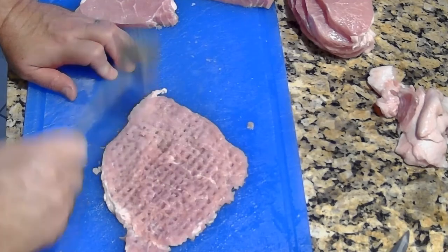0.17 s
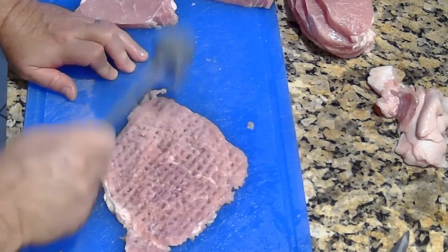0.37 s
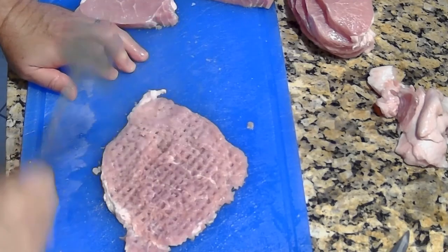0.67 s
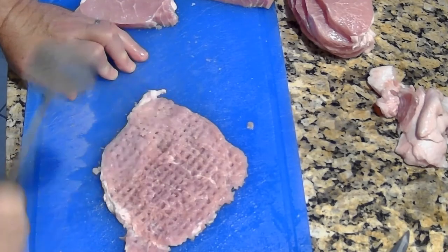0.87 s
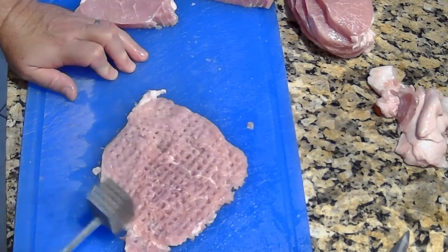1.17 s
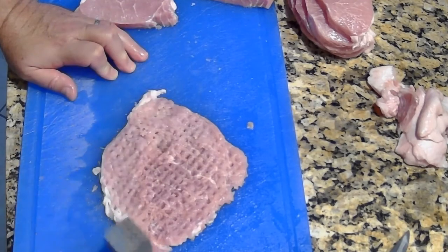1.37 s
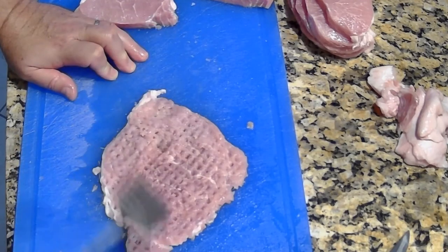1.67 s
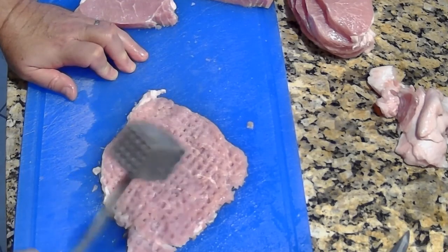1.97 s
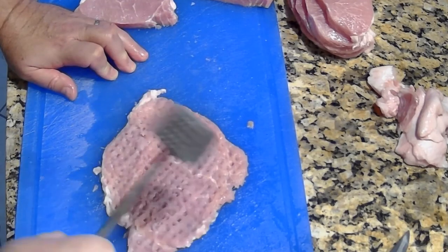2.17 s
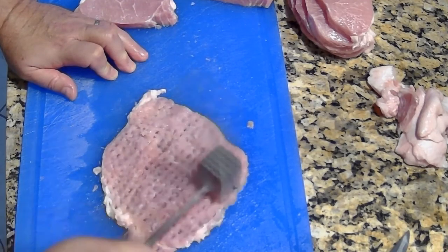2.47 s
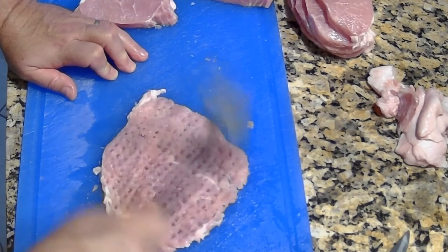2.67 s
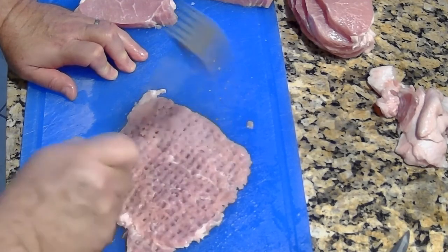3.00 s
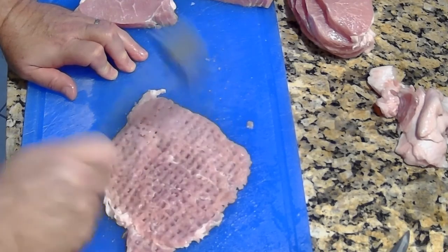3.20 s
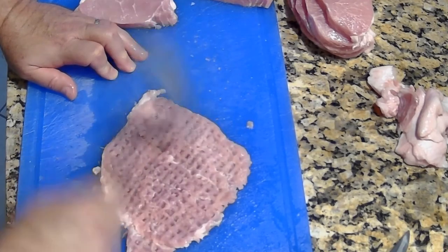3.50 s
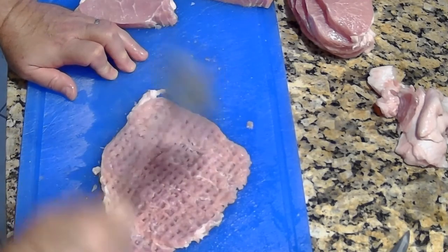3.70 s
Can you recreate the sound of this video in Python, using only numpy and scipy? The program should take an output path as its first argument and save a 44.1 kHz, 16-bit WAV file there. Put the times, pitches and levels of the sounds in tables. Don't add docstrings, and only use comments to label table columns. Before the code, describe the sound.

A meat mallet rapidly pounds raw pork on a plastic board, wet slaps with hard knocks

```python
import sys
import numpy as np
from scipy import signal
from scipy.fft import rfft, irfft
from scipy.io import wavfile

SR = 44100
rng = np.random.default_rng(int(sys.argv[2]) if len(sys.argv) > 2 else 0)


def gain_from_decibels(decibels):
    exponent = np.asarray(decibels, float) / 20
    return 10 ** exponent


def store_pcm(level_fs):
    pcm = np.round(np.clip(level_fs, -1, 1) * 32767).astype(np.int16)
    wavfile.write(sys.argv[1], SR, np.atleast_2d(pcm).T)


N = 169785


def at_hz(points, hz):
    table_hz, values = np.array(points).T
    return np.interp(np.log(hz), np.log(table_hz), values)


def rms_one(x):
    return x / np.sqrt(np.mean(x ** 2) + 1e-20)


def butter(x, hz, kind, order=2):
    return signal.sosfilt(signal.butter(order, hz, kind, fs=SR, output="sos"), x)


def ring(x, hz, t60):
    radius, angle = gain_from_decibels(-60 / (t60 * SR)), 2 * np.pi * hz / SR
    return signal.lfilter([0, np.sin(angle)], [1, -2 * radius * np.cos(angle), radius ** 2], x + 1e-18)


def ring_modes(modes, strike, chance):
    spread_db = 1.5
    out = 0
    for (hz, db, t60), luck in zip(modes, chance):
        out = out + gain_from_decibels(db + spread_db * luck) * ring(strike, hz, t60)
    return out


# frequency in Hz, level in dB per Hz.
HUM_COLOUR = [(12, -25), (65, 7.5), (120, -7.5), (250, -2.5), (600, -23), (2000, -8), (6000, -38.5),
              (16000, -60.5)]


def kitchen_hum():
    hum_db = -51
    hz = np.maximum(np.arange(N // 2 + 1) * SR / N, 1)
    spectrum = rfft(rng.standard_normal(N)) * gain_from_decibels(at_hz(HUM_COLOUR, hz))
    return gain_from_decibels(hum_db) * rms_one(irfft(spectrum, N))


def stirred_air():
    air_db, swing_db, swing_lag_s, swing_width_s = -38.5, 4, 0.12, 0.024
    gust_s, gust_db, gust_swing_s = 3.21, -13, 0.04
    t = np.arange(N) / SR
    swing = sum(np.exp(-((t - row[0] - swing_lag_s) / swing_width_s) ** 2) for row in BLOWS)
    lumps = butter(rng.standard_normal(N + SR), 22, "low", order=3)[SR:]
    swings = np.maximum(t - gust_s, 0) / gust_swing_s
    gust = gain_from_decibels(gust_db) * np.sin(1.56 * swings) * np.exp(-swings / 2)
    return gain_from_decibels(air_db + swing_db * swing) * rms_one(lumps) - gust


# start in seconds, peak level in dB.
TICKS = [(0.2089, -40), (0.2448, -45), (0.2594, -54), (0.4643, -62), (0.5194, -75), (0.6335, -40),
         (0.6704, -47), (0.8594, -52), (2.2694, -72), (2.601, -43), (2.6223, -55), (2.819, -43),
         (2.8514, -47), (2.8853, -60), (2.9103, -66), (3.0395, -47), (3.1218, -60), (3.1218, -48.5),
         (3.2645, -45), (3.6994, -38)]
# frequency in Hz, level in dB, t60 in seconds.
TINKLE = [(9800, -5, 0.017), (12400, -4, .01), (14500, -5, .015), (15500, -2, 0.034)]


def ticks():
    start_s, peak_db = np.array(TICKS).T
    out = np.zeros(N)
    for hz, mode_db, t60 in TINKLE:
        clicks = np.zeros(N)
        clicks[(start_s * SR).astype(int)] = gain_from_decibels(peak_db + mode_db - 3 + rng.normal(0, 3, len(TICKS)))
        out += ring(clicks, hz, t60)
    return out


# frequency in Hz, t60 in seconds.
ROOM_T60 = [(100, 1.2), (260, 0.26), (700, 0.4158), (1840, 0.335), (4850, 0.4177), (9000, 0.2335),
            (14000, 0.34)]
# frequency in Hz, level in dB.
ROOM_COLOUR = [(100, -7), (300, 3.5), (800, 0), (2000, 7.5), (4000, -5), (8000, -11.5), (15000, -18)]


def room_answer():
    room_db, rise_s = -6, 0.0042
    t = np.arange(int(0.6 * SR)) / SR
    white = rng.standard_normal((2, len(t)))
    edges = 60 * 2 ** np.arange(0, 8.3, 0.5)
    out = 0
    for k, (low, high) in enumerate(zip(edges, edges[1:])):
        hz = np.sqrt(low * high)
        decay = gain_from_decibels(at_hz(ROOM_COLOUR, hz) - 60 * t / at_hz(ROOM_T60, hz))
        out = out + decay * butter(white[k % 2], [low, high], "band")
    build_up = 1 - np.exp(-(t / rise_s) ** 2)
    return out * build_up * gain_from_decibels(room_db) / 20


def air_push(t, sink, fade, wet):
    push_db, hiss_db, rise_s = -9.5, -15, 0.0021
    squeeze = (t < sink) * np.clip(t / min(rise_s, sink), 0, 1) ** 3 + fade(0.0003)
    return butter(squeeze * (gain_from_decibels(push_db) + gain_from_decibels(hiss_db) * wet), 90, "high", order=1)


# frequency in Hz, level in dB, t60 in seconds.
BOARD = [(383, -5, 0.023), (521.7, -2, 0.045), (756, 0, 0.034), (889, -2.5, 0.031)]
# frequency in Hz, level in dB, t60 in seconds.
MEAT = [(998, -5.5, 0.012), (1300, -3.5, 0.0098), (1614, 4, 0.0062)]
# frequency in Hz, level in dB, t60 in seconds.
EDGE = [(2146, -5.5, 0.0084), (2548, -15.5, 0.028), (3260, -6.5, 0.011)]
# frequency in Hz, level in dB, t60 in seconds.
COUNTER = [(86.4, -17.5, .12), (195.9, -15.5, 0.16), (379.7, -25.5, 0.29), (940, -20, 0.25)]


def near_blow(row, landing, slap_db, chance, click, teeth, wet_crack):
    _, _, knock_db, crack_db, slap_hz = row
    _, _, thud_db, knock_hz, edge_db = landing
    slap = gain_from_decibels(-4.5) * ring(teeth, slap_hz, 0.016) + ring_modes(MEAT, teeth, chance[:3])
    edge = ring_modes(EDGE, teeth, chance[3:6])
    knock = gain_from_decibels(5.5) * ring_modes(BOARD, click, chance[6:10])
    knock = knock + gain_from_decibels(12.5) * ring(click, knock_hz, 0.021)
    hit = butter(gain_from_decibels(slap_db) * slap + gain_from_decibels(edge_db) * edge - gain_from_decibels(knock_db) * knock, 258, "high")
    thud = gain_from_decibels(thud_db) * ring_modes(COUNTER, click, chance[10:])
    return hit + thud + gain_from_decibels(1 + crack_db) * wet_crack


def far_blow(row, landing, slap_db, click):
    _, _, knock_db, crack_db, slap_hz = row
    _, _, _, knock_hz, edge_db = landing
    body = gain_from_decibels(22.5) * butter(click, [650, 1900], "band", order=1)
    slap = gain_from_decibels(-11.5 + slap_db) * ring(click, slap_hz, 0.0044)
    edge = gain_from_decibels(12 + edge_db) * butter(click, [1900, 3800], "band")
    knock = gain_from_decibels(35.5) * butter(click, [300, 800], "band", order=1)
    knock = knock + gain_from_decibels(10.5) * ring(click, knock_hz, 0.0035)
    crack = gain_from_decibels(21.5 + crack_db) * butter(click, [4000, 10000], "band", order=1)
    return butter(body + slap + edge + gain_from_decibels(knock_db) * knock, 3740, "low") + crack


def blow(row, landing, slap_db, chance, noise):
    strength_db, room_db = row[1], landing[1]
    sink = max(landing[0], 1) / 1000
    t = np.arange(len(noise[0])) / SR

    def fade(s):
        return (t >= sink) * np.exp(-np.maximum(t - sink, 0) / s)

    wet = butter(butter(noise[1], 2310, "high", order=1), 4700, "low", order=1)
    click = 1.0 * (np.arange(len(t)) == int(sink * SR))
    teeth = noise[0] * fade(0.0019)
    teeth = teeth / np.sqrt(np.sum(teeth ** 2)) - 1.083 * click
    near = near_blow(row, landing, slap_db, chance, click, teeth, wet * fade(0.0023))
    far = far_blow(row, landing, slap_db, click)
    return air_push(t, sink, fade, wet) + gain_from_decibels(strength_db) * near, gain_from_decibels(strength_db + room_db) * far


# start in seconds, strength in dB, board knock in dB, wet crack in dB, slap pitch in Hz.
BLOWS = [(0.15, 3.5, -12, -61, 858), (0.361, 4.5, -12.5, -55, 1775), (0.574, 4.5, -15, -12.5, 1218),
         (0.792, 6, -16.5, -12.5, 1294), (1.015, 4, -19, -2.5, 1475), (1.231, -0.5, -11.5, 3.5, 1270),
         (1.458, 3.5, -20.5, -2.5, 1300), (1.682, -8, -10.5, 8, 1300), (1.898, -2, -13, 3, 1370),
         (2.119, 2.5, -18.5, -6.5, 1393), (2.337, 1, -17.5, -8.5, 1300), (2.555, -6, -17.5, -12.5, 1340),
         (2.775, 7, -22, -52, 1193), (2.997, -3, -14, -37, 1028), (3.206, 7.5, -27.5, -16, 948),
         (3.426, 0, -15.5, -25, 1043), (3.64, -1, -11, -0.5, 1450)]
# sink-in before the slap in ms, sound sent into the room in dB,
# counter thud in dB, board knock pitch in Hz, edge of the teeth in dB.
LANDING = [(2.506, 0, 0, 632, 6), (3.7, -1.5, -4, 613, 1.5), (1, -1, -4, 570, -2),
           (2.7, -3.5, -11, 393, -1), (3, -2, -12, 390, 3), (2.7, -0.5, -7.5, 358, 11.5),
           (1.5, -2, -8, 330, 4), (2.6, -4, -2.5, 310, 8), (4.5, -4, -3, 543, 8.5),
           (3.7, -2.5, -15.5, 563, 0), (2.8, -0.5, -13.5, 537, 0), (3.5, 1.5, -1.5, 585, -2),
           (2.2, -2, -16, 340, -2), (4.1, 0, 0.5, 740, -5), (3.9, 1, -3.5, 640, 1.5),
           (6.2, 0, -4.5, 766, -17.5), (1.9, -6, -7, 655, 3)]
EARLIER_BLOW = (-0.0958, 0, -10.5, -12.5, 951)
EARLIER_LANDING = (1.2, 2.1, 2.9, 860, 0.67)
# level in dB, one a blow.
SLAP_SHARE_DB = [2.5, -1, 1, 0, -3.5, -9.5, 2, -1, 0.5, 2.5, -0.5, 3, 1.5, 4, -2, 3.5, -2]
# delay in seconds, level in dB.
ECHOES = [
    (.0085, -23),
    (0.0174, -20.5),
]


def pounding():
    lead, size = 8820, SR // 3
    direct, sent = np.zeros(N + lead + SR), np.zeros((2, N + lead + SR))
    rows, landings = [EARLIER_BLOW, *BLOWS], [EARLIER_LANDING, *LANDING]
    slaps_db = [0, *SLAP_SHARE_DB]
    chances = rng.standard_normal((len(rows), 15))
    noises = rng.standard_normal((len(rows), 2, size))
    for row, landing, slap_db, chance, noise in zip(rows, landings, slaps_db, chances, noises):
        i = lead + int(row[0] * SR)
        near, far = blow(row, landing, slap_db, chance, noise)
        direct[i:i + size] += near
        spot = 2 * chance[-1]
        sent[:, i:i + size] += far * [[np.cos(spot)], [np.sin(spot)]]
    out = direct.copy()
    dulled = butter(direct, 15000, "low", order=1)
    for delay_s, db in ECHOES:
        out += gain_from_decibels(db) * np.roll(dulled, int(delay_s * SR))
    for x in sent:
        out += signal.fftconvolve(x, room_answer())[:len(direct)]
    return out[lead:lead + N]


def scene():
    return (pounding() + stirred_air() + kitchen_hum() + ticks())[None]


def band_limit(x):
    return signal.sosfilt(signal.butter(12, 17120, fs=SR, output="sos"), x)


def record(dry):
    ceiling, knee = 0.73, 13
    squashed = dry / (1 + np.abs(dry / ceiling) ** knee) ** (1 / knee)
    hot = butter(squashed, 9, "high", order=1)
    hz = np.arange(N // 2 + 1) * SR / N
    top_cut = gain_from_decibels(np.interp(hz, [15700, 15900, 17100, 17200], [0, -24, -48, -90]))
    mix = irfft(rfft(hot) * top_cut, N)
    return band_limit(mix)


dry = scene()
out = record(dry)
store_pcm(out)
```